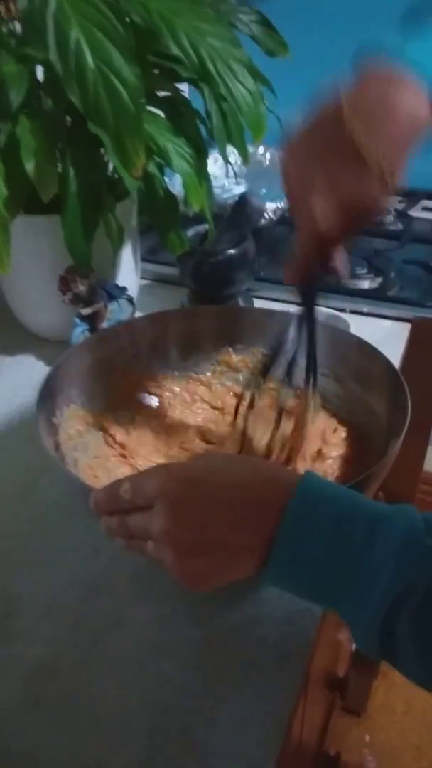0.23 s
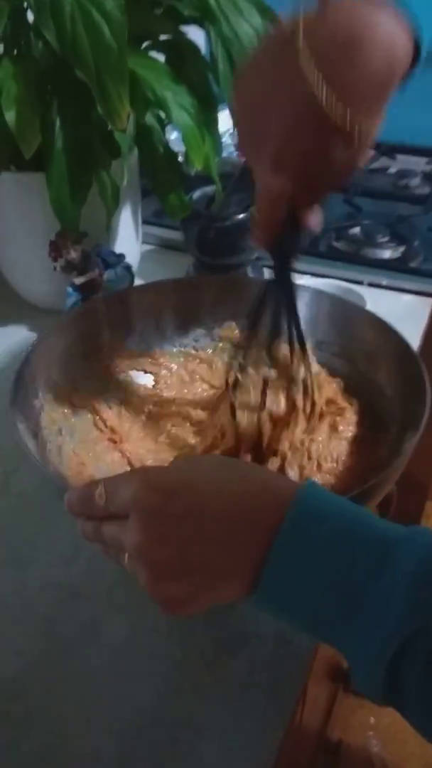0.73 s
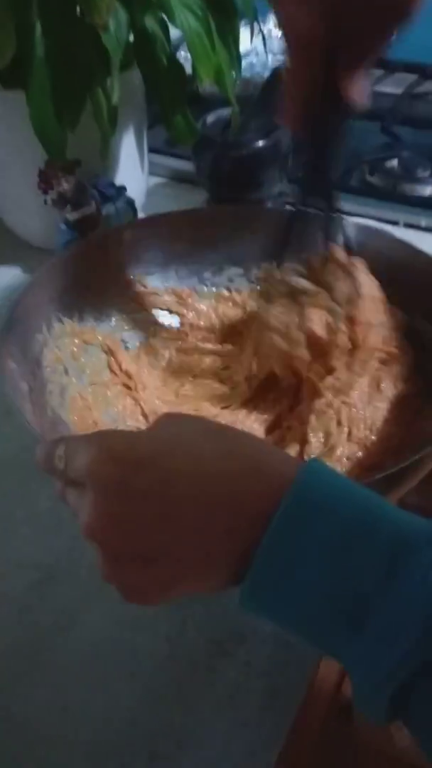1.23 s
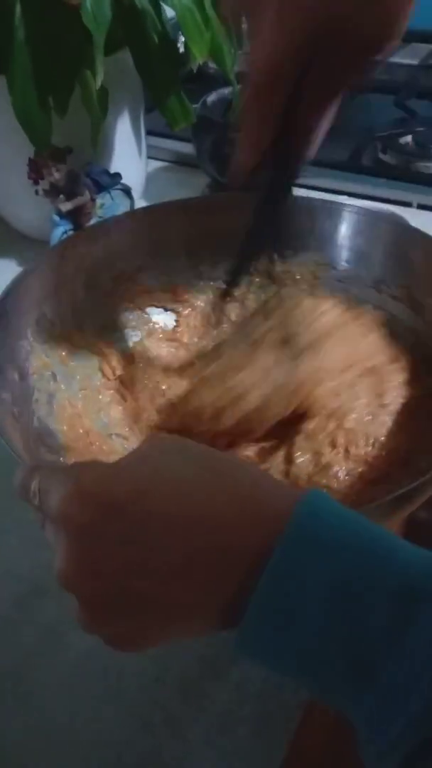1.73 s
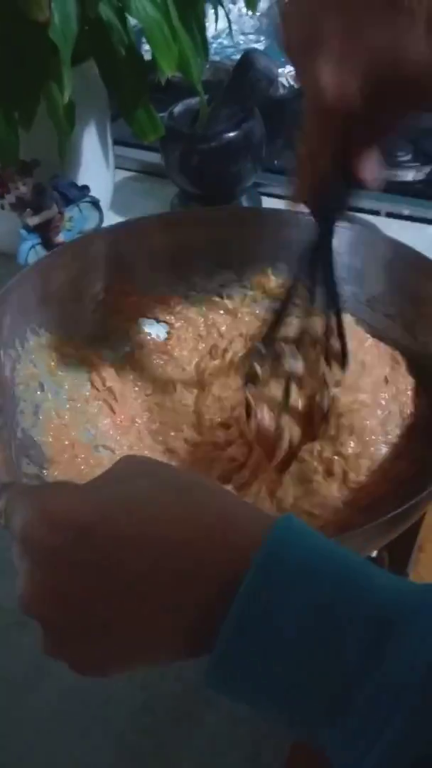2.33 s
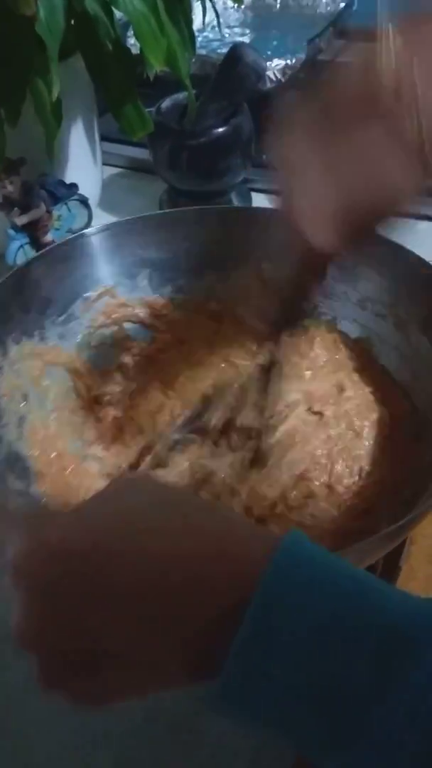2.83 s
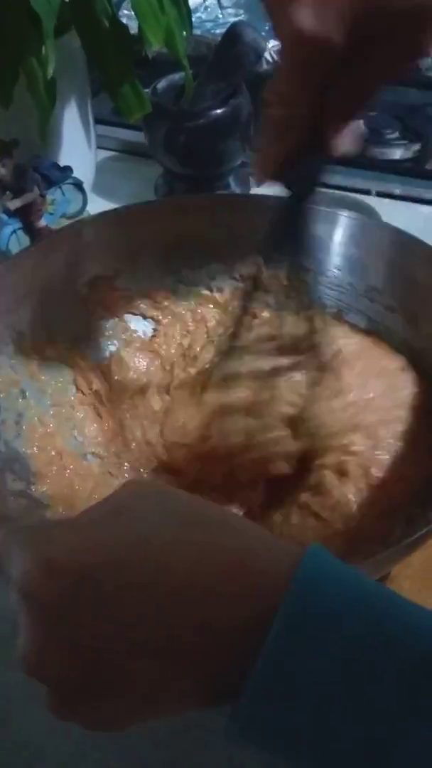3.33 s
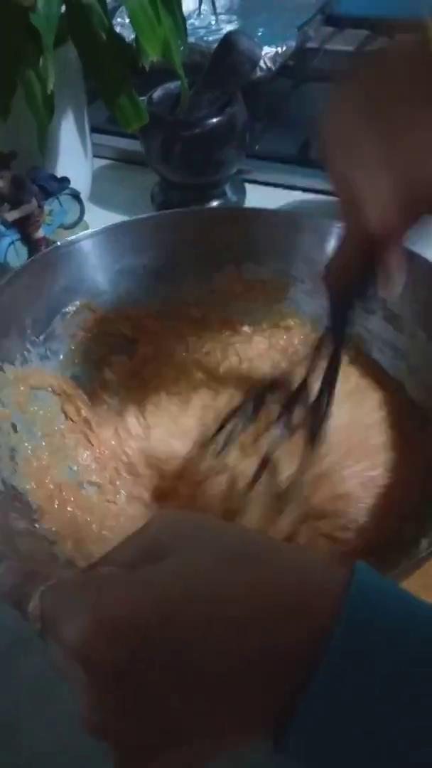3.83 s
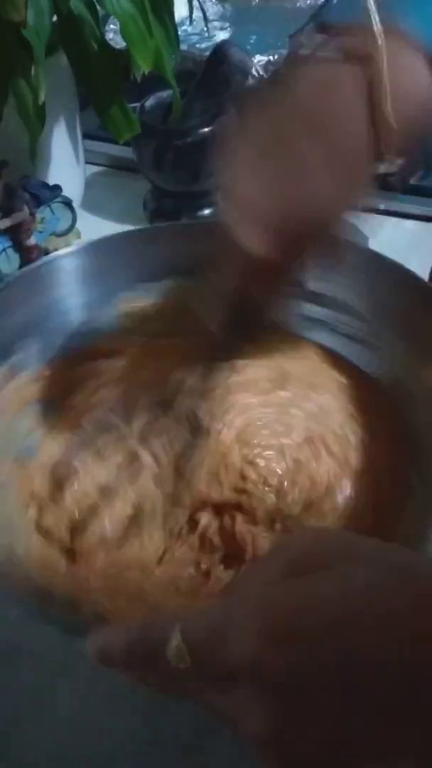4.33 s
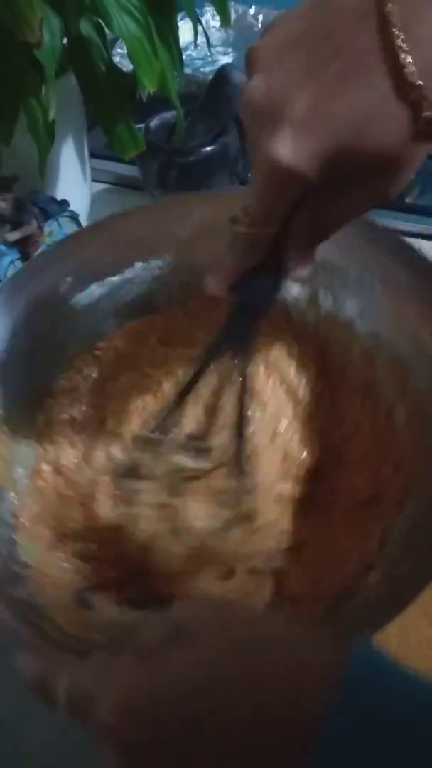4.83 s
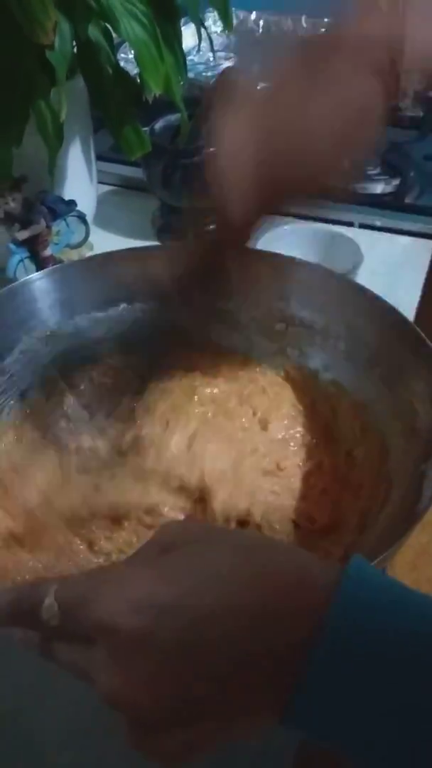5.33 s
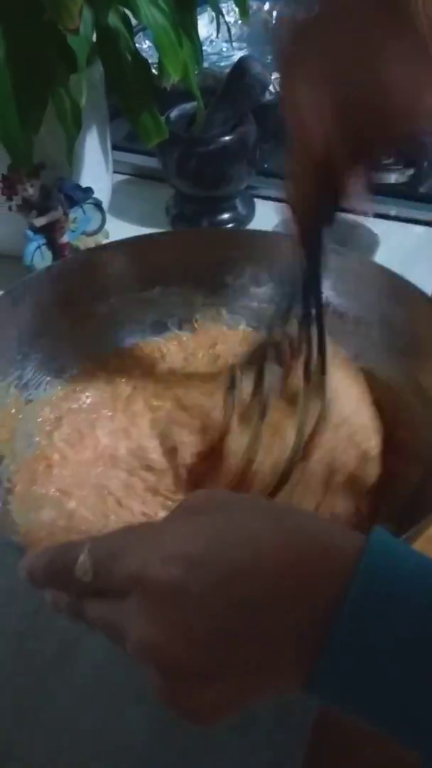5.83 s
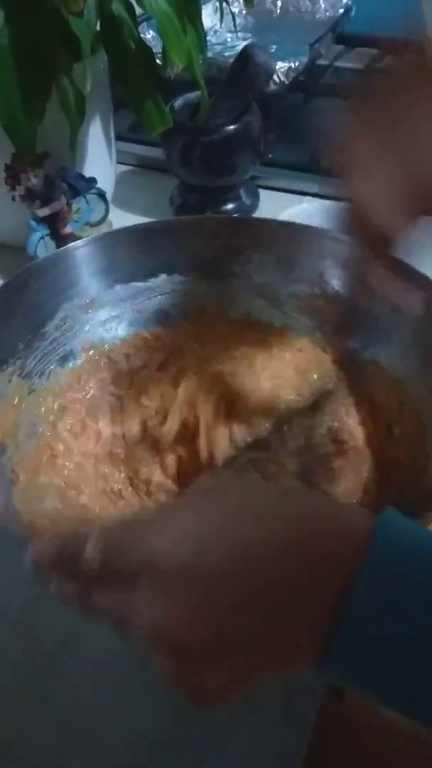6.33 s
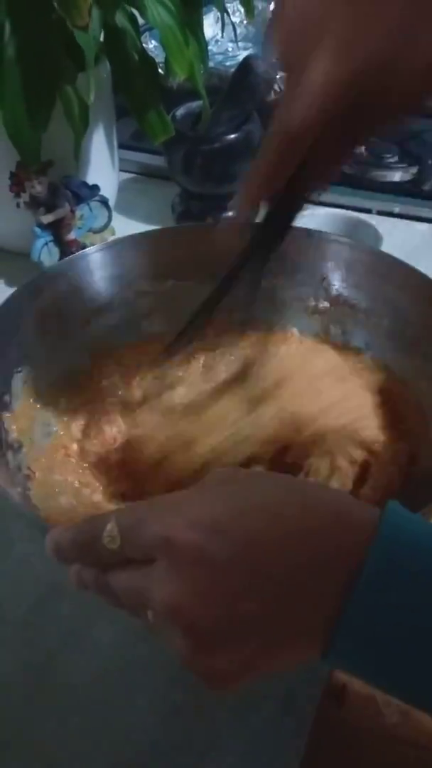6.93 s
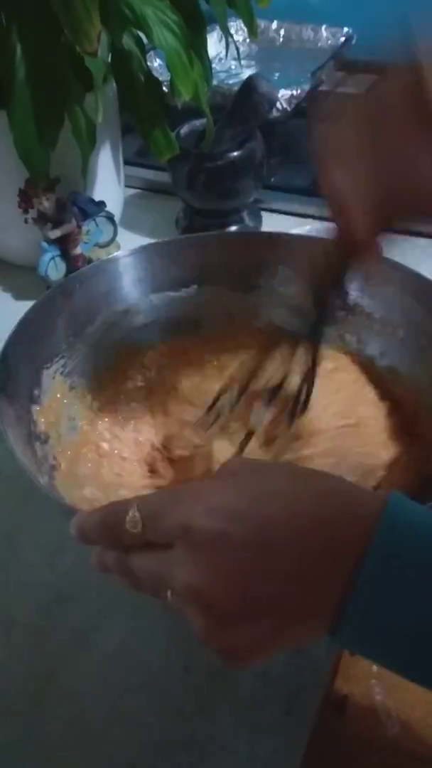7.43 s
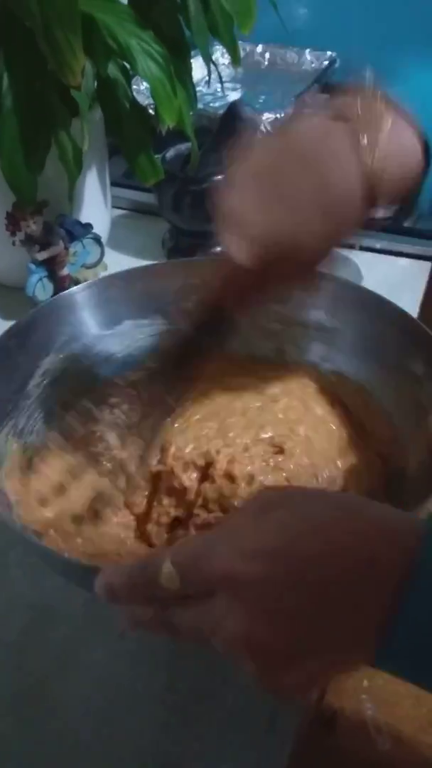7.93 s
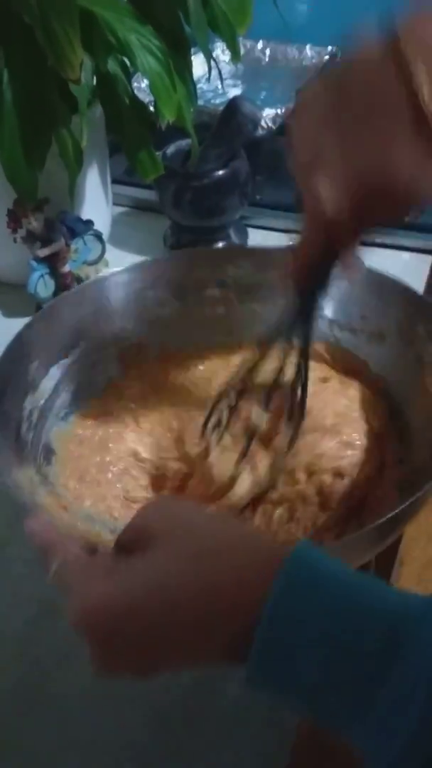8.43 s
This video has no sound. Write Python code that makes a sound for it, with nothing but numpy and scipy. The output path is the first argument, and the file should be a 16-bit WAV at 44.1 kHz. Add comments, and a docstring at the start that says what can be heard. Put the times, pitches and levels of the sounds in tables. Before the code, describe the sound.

Brisk, uneven hand whisking in a steel bowl. Wires smack and tear sticky batter, leaving bubbly hiss, little pops and soft puffs between strokes. Low bowl thuds join in, strongest just after the middle with a bright scraping clang, then further knocks and lighter clinks to the end. Close stereo pickup in a small hard-walled kitchen, over a low wavering hum and soft motor air.

```python
"""A wire whisk beats thick batter in a steel bowl, about three strokes a second, close to the microphone.
Each stroke smacks with its front and then its rear wires: shaped noise bursts with a sharp snap.
Between them the batter squelches and crackles, as wet hiss full of tiny pings and now and then a soft puff.
Hard strokes rock the bowl on the worktop, with low thuds and decaying modes, and scraped bare steel rings.
The small kitchen adds a short diffuse tail; an appliance hums with wavering sines over a soft rush of air."""
import sys
import numpy as np
from scipy import signal
from scipy.fft import rfft, irfft, next_fast_len
from scipy.io import wavfile
from scipy.ndimage import uniform_filter1d, map_coordinates

SR = 44100
rng = np.random.default_rng(int(sys.argv[2]) if len(sys.argv) > 2 else 0)


def store_wav(level_fs):
    """Save 16-bit WAV to argv[1]."""
    pcm = np.round(np.clip(np.atleast_2d(level_fs), -1, 1) * 32767)
    wavfile.write(sys.argv[1], SR, pcm.T.astype(np.int16))


N = 382788
TOP_HZ = 16000  # upper band limit


def amp(db):
    """Decibels to gain."""
    return 10 ** (np.asarray(db) / 20)


def unit(x):
    """Scale to rms 1."""
    return x / np.sqrt(np.mean(x ** 2) + 1e-20)


def along(points, hz):
    """Read (frequency, value) points at any frequency, on a log axis."""
    point_hz, values = np.transpose(points)
    return np.interp(np.log(hz + 1), np.log(point_hz + 1), values)


def wobble(rate_hz, size):
    """A smooth random curve with rate_hz knots a second."""
    knots = rng.standard_normal(int(size * rate_hz / SR) + 4)
    return map_coordinates(knots, [np.arange(size) * rate_hz / SR])


def filtered(x, response):
    """Multiply the spectrum of x by a response of frequency."""
    padded = next_fast_len(x.shape[-1] + SR // 2)
    spectrum = rfft(x, padded) * response(np.fft.rfftfreq(padded, 1 / SR))
    return irfft(spectrum, padded)[..., :x.shape[-1]]


def coloured(x, points, size=2048):
    """Minimum-phase colouring that keeps the power of white noise and smears nothing ahead of an onset."""
    cepstrum = irfft(np.log(amp(along(points, np.fft.rfftfreq(size, 1 / SR)))))
    cepstrum[1:size // 2] *= 2  # folded forward in time, so that the kernel is causal
    cepstrum[size // 2 + 1:] = 0
    kernel = irfft(np.exp(rfft(cepstrum)))
    return signal.fftconvolve(x, kernel[None] / np.linalg.norm(kernel), axes=1)[:, :N]


def add(track, s, sound):
    """Mix a sound into a track at time s."""
    start = max(round(s * SR), 0)
    part = sound[..., :max(N - start, 0)]
    track[..., start:start + part.shape[-1]] += part


# How alike left and right are: (frequency [Hz], correlation [0-1])
STEREO_LIKENESS = [(100,0.98),(250,0.91),(500,0.7),(1000,0.34),(4000,0.057),(12000,0.018)]


def spread(pair):
    """Two unrelated signals become left and right: alike in the bass, apart in the treble."""
    def mid_side_gains(hz):
        turn = np.arccos(np.clip(along(STEREO_LIKENESS, hz), -1, .998)) / 2
        return np.array([np.cos(turn), np.sin(turn)])

    mid, side = filtered(pair, mid_side_gains)
    return np.array([mid + side, mid - side])


# Modes of the batter-loaded bowl: (frequency [Hz], relative level [dB], 60 dB decay time [s])
BOWL_MODES = [(91,-13.5,0.53),(124.1,-2,0.36),(157.5,5,0.32),(203.9,-3.5,0.31),(231.2,-3,0.34),(272.2,-1.5,0.23),(326,-0.5,0.21),(420.4,-6.5,0.21),(598,1.5,0.17),(680.7,0,0.15),(780,-9.5,0.3),(871,-10,0.37),(919.4,-8.5,0.17),(1000,-13.5,0.39),(1115,-8.5,0.21),(1556,-22,0.13),(2088,-3.5,0.14),(2120,-25,0.3),(2240,-21,0.41),(3840,8,0.081),(4200,-13,0.3),(5170,5,0.17),(5400,2.5,0.12),(5950,-10,0.38),(5970,-16,.28),(6800,-22,.3),(8700,-8,0.2),(9781,-12,0.26)]


def ring(t, lo_hz, hi_hz, waver, apart, rate=90):
    """The bowl's modes in one range; shifting batter makes each waver, and each side hears its own phase."""
    out, power = np.zeros((2, len(t))), 1e-9
    for hz, db, t60 in BOWL_MODES:
        if lo_hz <= hz < hi_hz:
            knots = rng.standard_normal(400)
            drift = np.interp(t * rate, np.arange(len(knots)), knots)
            phase = 2 * np.pi * (hz * t + rng.random()) + waver * drift
            offset = apart * rng.standard_normal((2, 1))
            level = amp(db + 1.56 * rng.standard_normal() - 60 * t / t60)
            out += level * np.sin(phase + offset)
            power += amp(db) ** 2
    return out / np.sqrt(power)


# Whisk strokes: (time [s], smack level [dB, relative], brightness [dB], snap against the smack [dB, relative],
#   lag of the rear wires [s], rear wires over the smack [dB], stirring level [dB, relative])
WHISK_STROKES = [(0.032, -47.5, -1.5, 23, 0.019, -3, -57.5), (0.4973, -42.5, 2, 17, .027, -9, -57),
                 (0.972, -44, 2, 0, 0.014, -1.5, -55), (1.4, -62, 13, 5, 0.066, -6, -59),
                 (1.561, -46.5, 2.5, 0, 0.017, -9.5, -61), (1.798, -35, -1.5, -2, .022, 5.5, -59.5),
                 (2.187, -44, 1.5, 4, 0.019, -21, -63.5), (2.543, -50, -0.5, 0, 0.029, 3, -60),
                 (2.8272, -33, -3, 13, .023, 0, -61.5), (3.137, -41.5, 0, 5, 0.022, 6.5, -61),
                 (3.425, -47, -7.5, 16, 0.023, 18, -57.5), (3.728, -32.5, -0.5, 26, 0.02, -3.5, -55.5),
                 (4.0437, -39.5, -4, 18, 0.025, -24, -54.5), (4.323, -43.5, -1, -6, 0.037, -4, -56),
                 (4.4315, -44, -3, 9, 0.03, -16, -53.5), (4.580, -29.5, -5, 11, .013, 0, -54),
                 (5.051, -37.5, -0.5, 25, 0.035, -7, -54.5), (5.373, -39.5, 2, 7, .026, -3, -55),
                 (5.682, -43.5, -5, 8, .02, 0, -52.5), (6.016, -27.5, -2.5, 23.5, 0.026, -10.5, -54),
                 (6.342, -30.5, 0.5, 15, 0.022, -29, -58), (6.812, -69, 12, 4, 0.023, -9, -65),
                 (6.998, -40, -4, 14, .02, -13, -56), (7.319, -35.5, -3.5, 0, 0.023, -9, -54.5),
                 (7.612, -34.5, 0, 3, .019, 3.5, -56), (7.9285, -39.5, 3, 16, .018, 3, -54.5),
                 (8.235, -43.5, -0.5, 3, .026, 2, -55.5), (8.631, -54, -6.5, 2, 0.017, 7.5, -55)]
REAR_BRIGHT_DB, REAR_SNAP_DB = 4.5, -2  # the rear wires land in thinned batter: brighter, with a mild snap


def contacts():
    """Each stroke lands twice, front wires then rear: (time [s], level, brightness, relative snap [dB])."""
    for s, db, bright_db, snap_db, lag, rear_db, _ in WHISK_STROKES:
        yield s, db, bright_db, snap_db
        yield s + lag, db + rear_db, bright_db + REAR_BRIGHT_DB, REAR_SNAP_DB


# Colours of a smack, each as (frequency [Hz], relative level [dB]):
# its low body, the wire pressing through, the wire's edge, the fine spray and the snap of first contact
SMACK_BODY = [(120,-14),(400,2),(1000,4),(1700,-1.5),(3000,-16),(8000,-63)]
WIRE_BITE = [(500,-16),(1300,-7),(2000,-0.5),(3300,-2),(4800,-6),(12000,-31.5)]
WIRE_EDGE = [(1000,-40),(2800,-10),(4000,5),(6800,3.5),(9000,-30),(16000,-50)]
FINE_SPRAY = [(3000,-41),(6500,6),(8500,7.5),(12000,1.5),(16000,-3)]
CONTACT_SNAP = [(200,-46),(600,-9),(1200,10.5),(2500,-4.5),(4000,3),(6500,1.5),(9000,-5),(16000,-24)]


def smacks(rise_s=0.001718, burst_t60_s=0.03, snap_db=-10, snap_t60_s=0.0019,
           lead_db=-10, lead_t60_s=0.015, wet_db=-18, wet_t60_s=0.14, width=0.57, grainy_db=2.5,
           body_db=-2, bite_db=-6, edge_db=-3, spray_db=-3, wall_db=-12, wall_t60_s=0.16):
    """The wires plough up a short swell, snap onto the wall and tear the batter, which leaves a wet tail."""
    early_s = .02  # the swell starts this long before contact
    t = np.arange(SR // 4) / SR - early_s
    lead = amp(lead_db - 60 * np.abs(t) / lead_t60_s)
    onset = np.clip(t / rise_s, 0, 1) ** 2
    strike = amp(-60 * np.maximum(t - rise_s, 0) / burst_t60_s)
    wet_tail = amp(wet_db - 60 * t / wet_t60_s)
    burst = lead + onset * (strike + wet_tail)
    after = t[t >= 0]

    layers = np.zeros((4, 2, N))
    snaps, wall = np.zeros((2, 2, N))
    tilts = np.linspace(-1, 1, len(layers))  # brightness trades body for spray
    for s, db, bright_db, hard_db in contacts():
        for layer, tilt in zip(layers, tilts):
            grain = amp(grainy_db * wobble(927, len(t)))
            mid, side = rng.standard_normal((2, len(t))) * grain
            stereo = np.array([mid + width * side, mid - width * side])
            add(layer, s - early_s, amp(db + tilt * bright_db) * burst * stereo)

        mid, side = rng.standard_normal((2, len(t)))
        snap = amp(db + hard_db + snap_db - 60 * np.abs(t - rise_s) / snap_t60_s)
        add(snaps, s - early_s, snap * np.array([mid + 1.3 * side, mid - 0.44 * side]))

        # the wall rings muffled under the batter
        muffled = amp(db - bright_db + wall_db - 60 * after / wall_t60_s) * np.minimum(after / rise_s, 1)
        add(wall, s, muffled * ring(after, 520, 1700, waver=1.0, apart=0.32))

    gains = amp([body_db, bite_db, edge_db, spray_db])
    colours = (SMACK_BODY, WIRE_BITE, WIRE_EDGE, FINE_SPRAY)
    tear = sum(gain * coloured(layer, colour) for gain, layer, colour in zip(gains, layers, colours))
    return (tear + wall + coloured(snaps, CONTACT_SNAP)) * amp([[1.2], [-1.2]])  # leans left


# Small wet pops, squeaks, light smacks and whisk swishes:
#   (time [s], level [dB, relative], centre pitch [Hz], length to either side of the peak [s])
SOFT_PUFFS = [(0.05, -66.5, 3150, 0.06), (0.85, -45.5, 5430, 0.0016), (1.09, -40, 8000, 0.0017),
              (1.121, -46, 3370, 0.018), (1.859, -38, 1940, 0.0077), (2.009, -43, 3000, 0.0018),
              (2.468, -47, 6000, .002), (3.238, -42.5, 6000, 0.0024), (3.522, -49.5, 11000, 0.019),
              (3.815, -42, 5800, 0.019), (4.177, -49, 12000, .003), (4.273, -47, 9000, .003),
              (4.512, -50, 6260, 0.019), (4.737, -31.5, 2880, 0.0011), (4.775, -45, 5000, 0.0032),
              (5.204, -36, 2010, 0.0029), (5.488, -37.5, 3340, 0.0015), (5.858, -48, 2580, 0.0076),
              (6.429, -43, 2860, 0.0046), (6.546, -42.5, 3150, 0.0027), (7.446, -42.5, 3060, 0.0028),
              (7.477, -39, 2020, 0.0017), (7.83, -43.5, 3870, .0023), (8.21, -43, 5640, .003),
              (8.256, -41, 7150, 0.024)]


def puffs(width_share=0.47):
    """Each is a soft puff of noise around its own pitch."""
    t = np.arange(-SR // 8, SR // 8) / SR
    out = np.zeros((2, N))
    for s, db, hz, length in SOFT_PUFFS:
        noise = rng.standard_normal((2, len(t)))
        puff = unit(filtered(noise, lambda f: 1 / (1 + ((f - hz) / (width_share * hz)) ** 4)))
        add(out, s + t[0], amp(db) * np.exp(-(t / length) ** 2) * puff)
    return spread(out)


STIR_HOLD_S = 0.09  # the whisk drags at full strength, then fades until the next stroke


def stirring(fade_db_per_s, bright_share):
    """Level in dB of the drag through the batter: each stroke holds, then fades; brightness shifts it."""
    starts, _, bright_db, *_, stir_db = np.transpose(WHISK_STROKES)
    t = np.arange(N) / SR
    stroke = np.maximum(np.searchsorted(starts, t) - 1, 0)
    fading_s = np.maximum(t - starts[stroke] - STIR_HOLD_S, 0)
    held_db = (stir_db + bright_share * bright_db)[stroke]
    return uniform_filter1d(held_db - fade_db_per_s * fading_s, size=900)  # steps eased over 20 ms


def bubbles(rate, centre_hz, cycles, range_db, size=256):
    """Tiny air pockets burst in the batter, each a damped ping at its own pitch and place; few are loud."""
    count = int(rate * N / SR)
    when, pitch, strength, place = rng.random((count, 4)).T[:, :, None]
    hz = np.minimum(centre_hz * 2 ** (2 * pitch - 1), TOP_HZ)  # an octave either way
    turns = hz * np.arange(size) / SR
    decay = amp(range_db * strength ** 2) * np.exp(-turns / cycles)
    index = ((when * N).astype(int) + np.arange(size)).ravel()
    sides = []
    for way in (1, -1):  # place shifts the phase between left and right
        pings = decay * np.sin(2 * np.pi * turns + way * 3 * (place - .5))
        sides.append(np.bincount(index, pings.ravel(), N)[:N])
    return unit(np.array(sides))


# Hiss of low tearing and of fine air crackle: (frequency [Hz], relative level per Hz [dB])
SQUELCH_COLOUR = [(300,-30),(800,12),(1300,4.5),(2500,4.5),(4000,3.5),(6500,-1.5),(10000,-40),(16000,-1)]
CRACKLE_COLOUR = [(2000,-23),(5000,-5),(8000,-2.5),(11000,-3),(15500,-11.5)]


def batter(squelch_gain_db=-1, crackle_gain_db=-2, pop_db=-3):
    """Sticky batter tears and closes around the wires: a wet hiss full of small pops."""
    flutter = wobble(50, N)  # strands of batter let go in clumps

    def level(db):
        return amp(db + 1.97 * flutter + 3.17 * wobble(50, N))

    def hiss(colour):
        return unit(spread(coloured(rng.standard_normal((2, N)), colour)))

    pops = bubbles(rate=300, centre_hz=4000, cycles=1.8, range_db=20)
    ticks = bubbles(rate=400, centre_hz=9500, cycles=1.4, range_db=30)
    squelch_db = squelch_gain_db + stirring(fade_db_per_s=39, bright_share=-0.093)
    crackle_db = crackle_gain_db + stirring(fade_db_per_s=32.5, bright_share=0.24)  # bright strokes crackle more
    squelch = level(squelch_db) * (hiss(SQUELCH_COLOUR) + amp(pop_db) * pops)
    crackle = level(crackle_db) * (hiss(CRACKLE_COLOUR) + amp(pop_db) * ticks)
    return squelch + crackle


# The bowl rocking on the worktop: (time [s], level [dB, relative], hardness [dB], thud pitch [Hz])
BOWL_KNOCKS = [(0.003, -41.5, 4, 135), (0.043, -45.5, -12, 153), (0.523, -43.5, 8.5, 328),
               (0.686, -52.5, -6, 134), (1.82, -43.5, 17, 115), (1.855, -39.5, 1, 325),
               (2.824, -34, 4.5, 248), (3.137, -37, 4, 130), (3.447, -31, 1.5, 266), (3.727, -48, 9, 217),
               (4.334, -39.5, -1, 135), (4.433, -25, 1.5, 217), (4.581, -14, -3, 202),
               (4.593, -22.5, 15, 156), (5.042, -20, 2, 158), (5.395, -29.5, 1, 159),
               (5.685, -45.5, -2, 144), (6.035, -20.5, 1.5, 153), (6.358, -42, 4.5, 219),
               (6.494, -47.5, -9, 153), (6.804, -35.5, -4, 169), (7.139, -30.5, -4.5, 160),
               (7.322, -40.5, 0, 173), (7.627, -30, -0.5, 174), (7.94, -36.5, -4, 160),
               (8.018, -29, -0.5, 125), (8.105, -26, -7, 154), (8.487, -34, 1, 128)]
# Rattle on the worktop: (frequency [Hz], relative level [dB])
RATTLE_COLOUR = [(25,-27),(45,-17),(65,3.5),(160,-1),(300,5),(550,-8.5),(1000,-15.5),(2000,-19),(6000,-25.5),(16000,-64)]


def knocks(thud_cycles=0.73, thud_db=6, low_db=2, clunk_db=-1, clack_db=-10, rattle_db=-8, rattle_t60_s=0.37):
    """The base bumps the worktop: a heavy push, batter-damped modes, higher when hard, and a short rattle."""
    t = np.arange(SR // 2) / SR
    onset = 1 - np.exp(-t / 0.0015)
    out, rattle = np.zeros((2, 2, N))
    for s, db, hard_db, thud_hz in BOWL_KNOCKS:
        u = t * thud_hz / thud_cycles  # a firmer contact is both higher and shorter
        push = (u * np.exp(1 - u)) ** 2
        add(out, s, amp(db + thud_db) * np.sin(2 * np.pi * thud_hz * t) * push)

        low = ring(t, 0, 220, waver=0.58, apart=0.13)
        clunk = ring(t, 220, 520, waver=0.6, apart=0.14) * amp([[-1], [1]])
        clack = ring(t, 520, 980, waver=1.0, apart=0.23)
        add(out, s, amp(db + low_db - hard_db / 2) * onset * low)
        add(out, s, amp(db + clunk_db + hard_db / 2) * onset * clunk)
        add(out, s, amp(db + clack_db + hard_db) * onset * clack)

        rattle_level = amp(db + rattle_db + hard_db / 2 - 60 * t / rattle_t60_s)
        add(rattle, s, rattle_level * onset * rng.standard_normal((2, len(t))))
    return out + spread(coloured(rattle, RATTLE_COLOUR))


# Bare steel set ringing: (time [s], level [dB, relative], shimmer over that [dB])
STEEL_CLINKS = [(4.4558, -43, -3), (4.6014, -23.5, -10), (4.6144, -18.5, -36), (4.6564, -27.5, -1),
                (5.0574, -21, -12), (5.0994, -35.5, -1.5), (5.406, -40, -1), (6.0483, -25.5, -9),
                (6.0872, -37.5, -1), (7.1494, -43.5, -9), (7.6414, -40.5, -18), (8.0375, -36, -3.5),
                (8.1162, -32.5, -4.5)]
# Wires chattering on steel: (frequency [Hz], relative level [dB])
SCRAPE_COLOUR = [(600, -21), (1100, 6.5), (1700, -6), (2200, 3), (3000, -3), (4200, 0), (6000, -6),
                 (9000, -15), (16000, -28)]


def clinks(belly_db=-1, wall_db=-1, rise_s=0.0015, scrape_db=-3, scrape_t60_s=0.11):
    """Wires scrape the bare wall: it sings near 1 and 2 kHz, with a rough shimmer of higher modes."""
    t = np.arange(SR // 2) / SR
    onset = 1 - np.exp(-t / rise_s)
    out, scrape = np.zeros((2, 2, N))
    for s, db, high_db in STEEL_CLINKS:
        belly = ring(t, 900, 1700, waver=1.0, apart=0.98)
        wall = ring(t, 1800, 3000, waver=1.0, apart=0.54) * amp([[3.5], [-4]])
        shimmer = ring(t, 3000, SR, waver=1.0, apart=0.41, rate=160) * amp([[1.5], [-1.5]])
        add(out, s, amp(db + belly_db) * onset * belly)
        add(out, s, amp(db + wall_db) * onset * wall)
        add(out, s, amp(db + high_db) * onset * shimmer)

        scrape_level = amp(db + high_db / 2 + scrape_db - 60 * t / scrape_t60_s)
        add(scrape, s, scrape_level * onset * rng.standard_normal((2, len(t))))
    return out + spread(coloured(scrape, SCRAPE_COLOUR))


# Diffuse tail of the kitchen: (frequency [Hz], 60 dB decay time [s])
KITCHEN_DECAY = [(100,0.68),(500,0.67),(2000,0.5),(6000,0.48),(15000,0.51)]


def kitchen(x, low_hz=260, count=40):
    """Hard walls answer with a short diffuse tail, thin in the bass, drawn afresh for each short stretch."""
    send = signal.sosfilt(signal.butter(2, low_hz, "high", fs=SR, output="sos"), x.mean(axis=0))
    out, start = np.zeros((2, N)), 0
    for piece in np.array_split(send, count):
        hz, t, noise = signal.stft(rng.standard_normal((2, SR // 2)), SR, nperseg=256)
        decay = amp(-60 * t / along(KITCHEN_DECAY, hz)[:, None])
        tail = signal.istft(noise * decay, SR, nperseg=256)[1]
        tail = tail * np.minimum(np.arange(tail.shape[1]) / SR / 0.0057, 1)  # builds up over 5.7 ms
        add(out, start / SR, signal.fftconvolve(piece[None], tail / np.linalg.norm(tail[0]), axes=1))
        start += len(piece)
    return spread(out)


# Partials of the appliance: (frequency [Hz], level [dB, relative])
HUM_PARTIALS = [(118.4, -56.5), (150.7, -67.5), (183.0, -60.5), (242.2, -61), (301.5, -61), (333.8, -55.5),
                (393.0, -63), (597.5, -70.5), (668, -63.5), (1425, -70), (1453, -68.5)]
# Rush of its motor: (frequency [Hz], relative level per Hz [dB])
MOTOR_AIR = [(25,-5),(50,-6),(100,2.5),(200,-5),(340,-0.5),(500,-11),(680,-9.5),(850,-15.5),(1200,-16.5),(1450,-9),(1900,-20),(3000,-30.5),(8000,-55),(16000,-59)]


def appliance(hum_db=-1, air_db=-54):
    """A constant appliance hum of gently wavering partials, with the soft rush of its motor."""
    t = np.arange(N) / SR
    hum = np.zeros(N)
    for hz, db in HUM_PARTIALS:
        level = amp(db + hum_db + 3.1 * wobble(6, N))
        phase = 2 * np.pi * (hz * t + rng.random()) + 0.5 * wobble(4.6, N)
        hum += level * np.sin(phase)
    air = unit(spread(coloured(rng.standard_normal((2, N)), MOTOR_AIR)))
    return hum + amp(air_db) * air


def scene():
    """Whisk, batter and bowl in the kitchen, with the appliance behind."""
    whisk = smacks() + puffs()
    bowl = knocks() + clinks()
    room = kitchen(amp(-5.0) * whisk + amp(-8.5) * bowl)
    return whisk + batter() + bowl + room + appliance()


def record(dry, low_cut_hz=52):
    """The microphone sheds deep bass, and nothing is kept above the band limit."""
    thin = signal.sosfilt(signal.butter(2, low_cut_hz, "high", fs=SR, output="sos"), dry)
    return filtered(thin, lambda hz: hz < TOP_HZ)


dry = scene()
out = record(dry)
store_wav(out)
```